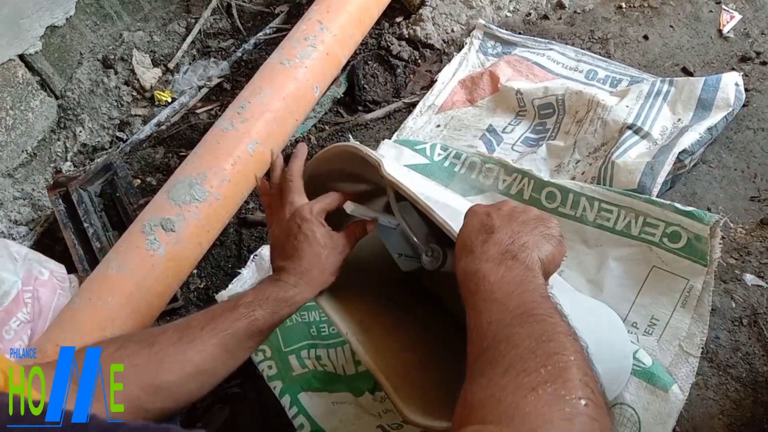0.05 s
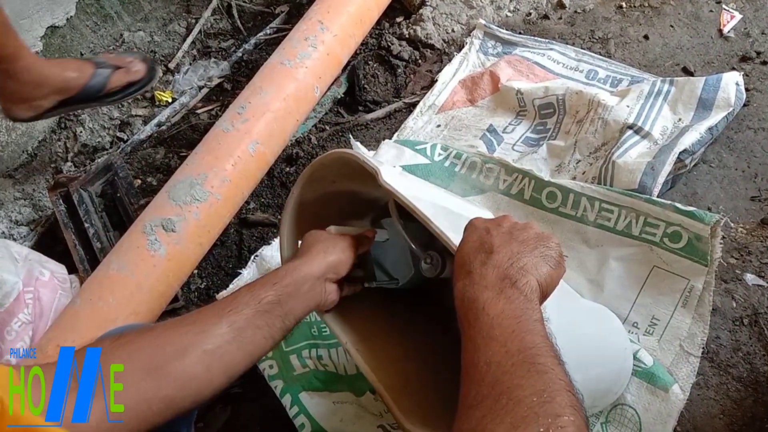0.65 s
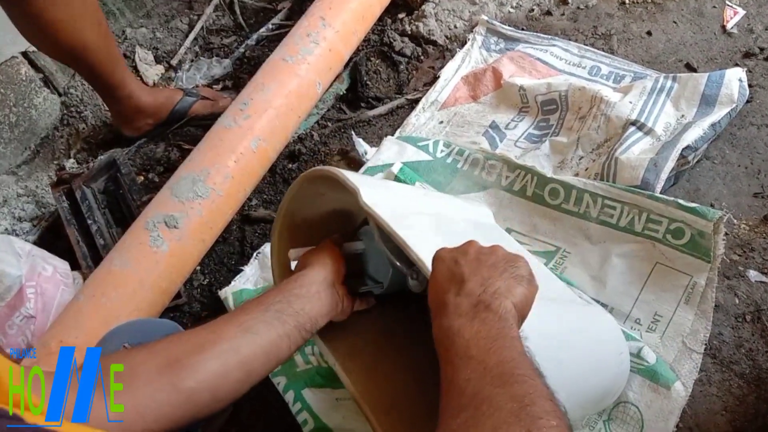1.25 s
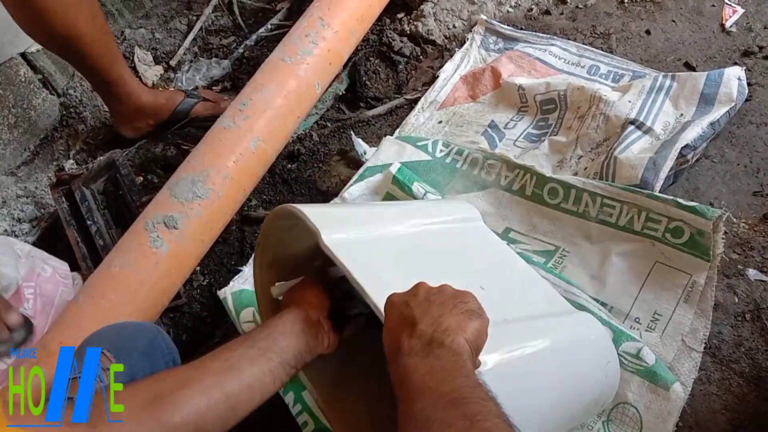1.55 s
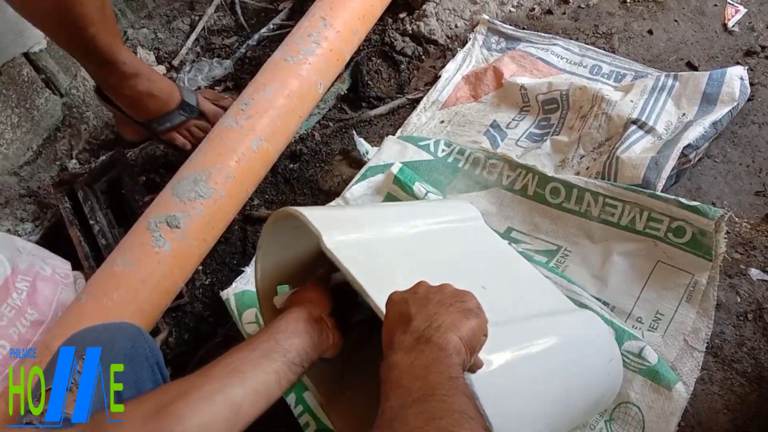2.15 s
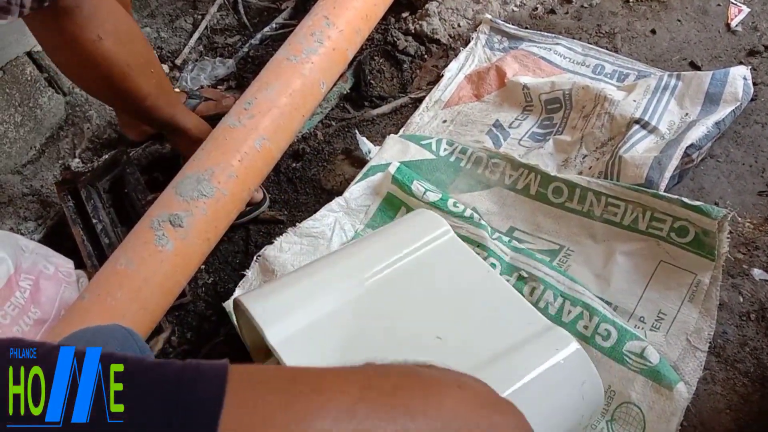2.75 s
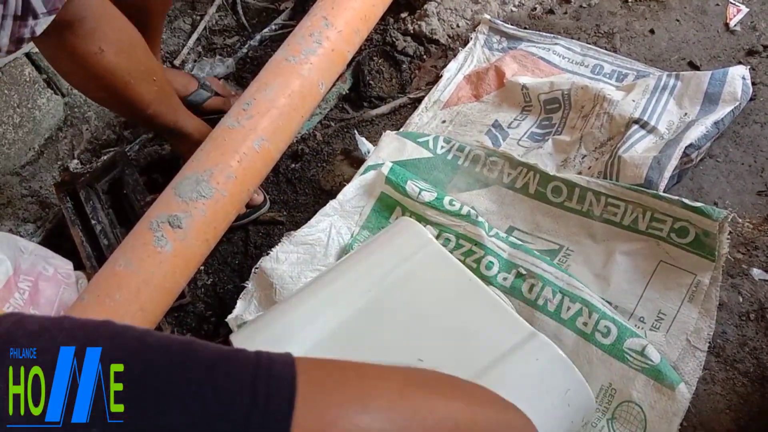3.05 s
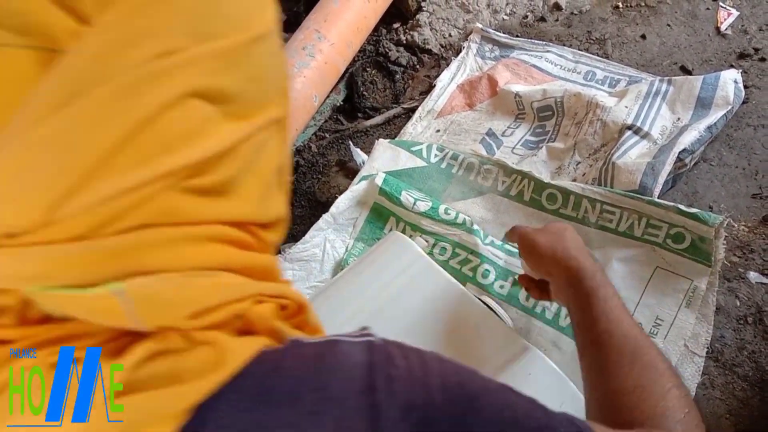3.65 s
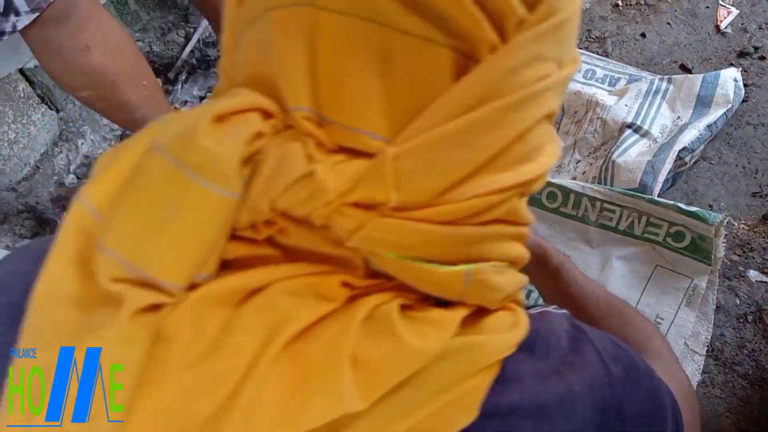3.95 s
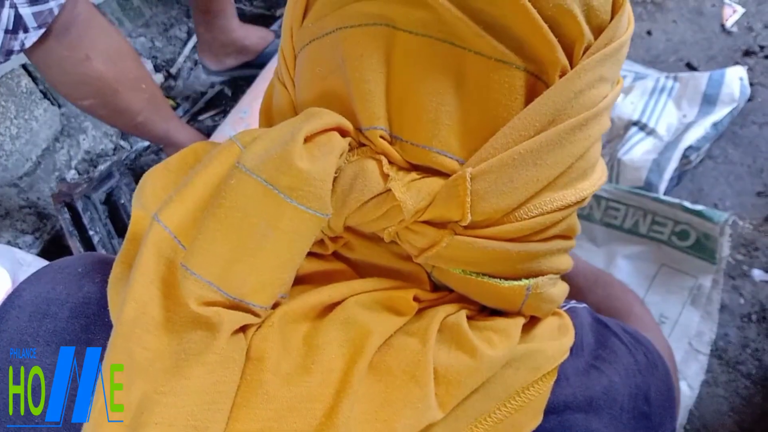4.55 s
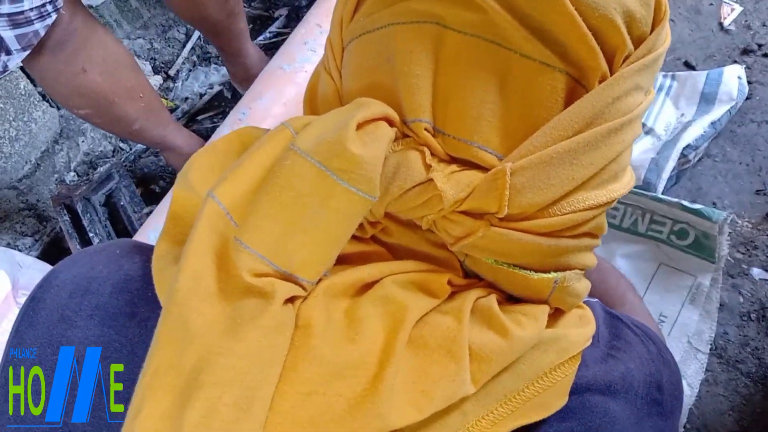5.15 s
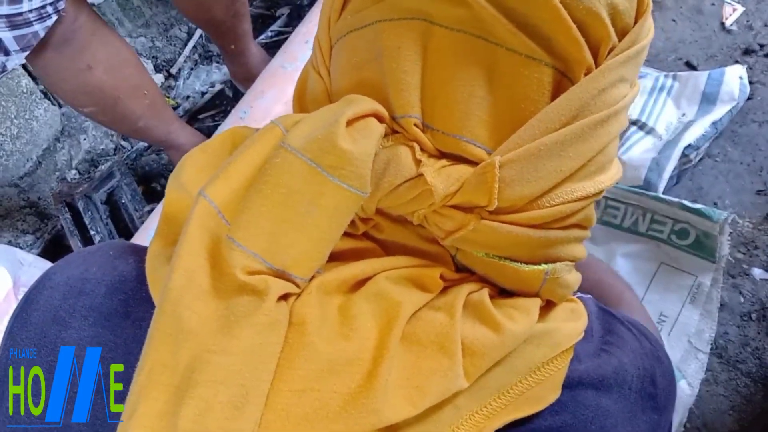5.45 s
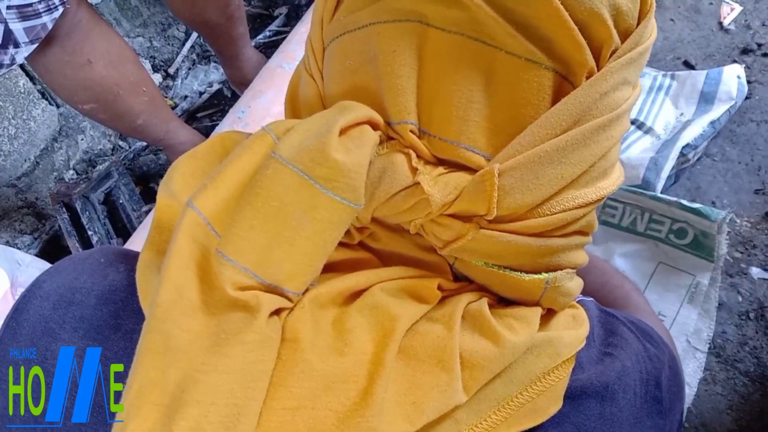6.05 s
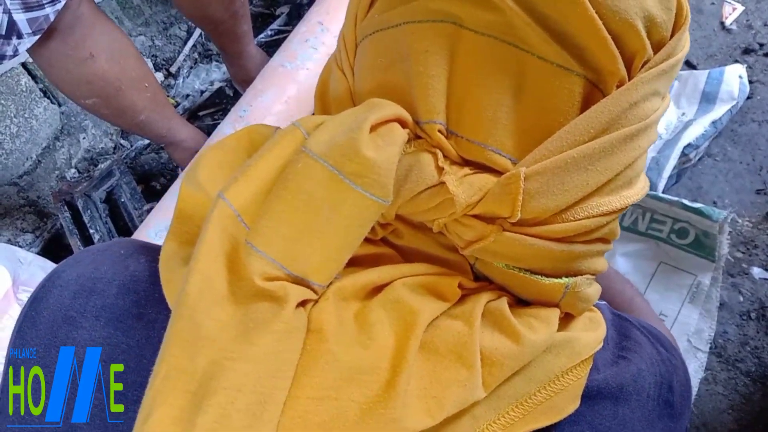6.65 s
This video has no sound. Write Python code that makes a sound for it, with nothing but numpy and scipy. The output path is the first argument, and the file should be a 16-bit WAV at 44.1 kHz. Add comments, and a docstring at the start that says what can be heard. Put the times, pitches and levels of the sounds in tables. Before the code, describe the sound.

A porcelain tank grinds and rustles on woven plastic sacks outdoors, followed by five quick, sharp scraping strokes.

```python
"""Woven plastic sacks rustle and crackle outdoors as a porcelain toilet tank is handled on them: their
strands stick and slip, and creases buckle. The tipped tank grinds over grit, its hollow booms softly,
and fingers knock its plastic valve. Then five quick strokes, each a sharp catch and a scrape, excite
the modes of the porcelain. A low drone swells and fades; a far motor's hum and a thin hiss lie beneath."""
import sys
import numpy as np
from scipy import signal
from scipy.fft import rfft, irfft, next_fast_len
from scipy.io import wavfile
from scipy.ndimage import uniform_filter1d

SR = 44100
rng = np.random.default_rng(int(sys.argv[2]) if len(sys.argv) > 2 else 0)


def unload_wav(signal):
    """Save mono or channel-first audio to the path in sys.argv[1] as 16-bit WAV at rate SR, clipped to [-1, 1]."""
    wavfile.write(
        sys.argv[1],
        SR,
        np.round(np.clip(np.atleast_2d(signal).T, -1, 1) * 32767).astype(np.int16),
    )


N = 299924
T = np.arange(N) / SR


# Rubbing on the sacks as the tank is tipped (time [s], level [dB], bass gain [dB])
TIPPING = [(1.085, -61, -9), (1.135, -42, -17.5), (1.275, -36, -11.5), (1.459, -40, -3.5),
           (1.505, -34, -18.5), (1.62, -37.5, -24)]
# Rubbing as the tank is laid down and pushed along (time [s], level [dB], bass gain [dB])
LAYING = [(2.42, -70.5, -5.5), (2.652, -51.5, -16.5), (2.724, -42, 1), (2.96, -40, -7.5),
          (2.976, -32.5, -7.5), (3.17, -32, -2), (3.382, -42, -13), (3.538, -34.5, -2),
          (3.598, -32.5, -11.5), (3.78, -50.5, -10)]
# Brushes of hands and tank against the sacks (time [s], duration [s], level [dB], bass gain [dB])
BRUSHES = [(-.1, 0.21, -40.5, -13), (0.175, 0.36, -57, -18), (0.43, 0.25, -52, -10), (3.75, 0.29, -46, -12),
           (5.238, .15, -56, -10), (5.43, .06, -62, 12)]
def rubbing():
    """Incoherent sources add in power: the joint level and bass gain of all rubbing, in dB."""
    moves = [(undb(db), bass_db) for db, bass_db in (curves(TIPPING), curves(LAYING))]
    for start, length, db, bass_db in BRUSHES:
        moves.append((undb(db) * burst(start, rise=0.53 * length, t60=0.42, length=length), bass_db))
    power = sum(gain ** 2 for gain, _ in moves)
    bass_power = sum((gain * undb(bass_db)) ** 2 for gain, bass_db in moves)
    return 10 * np.log10(power), 10 * np.log10(bass_power / power)


# Spectrum of the plastic weave (frequency [Hz], level [dB])
WEAVE_SPECTRUM = [(50, -22.5), (110, 0), (160, -24), (235, -4.5), (400, -18), (1100, -3), (2100, -8.5),
                  (3300, -5), (4600, -10.5), (6000, 0), (7900, -19.5), (13500, -17.5), (16000, -26.5)]
def sacks():
    """Stick-slip friction: strands slip in clusters; pressure adds bass, light brushing stays bright."""
    db, bass_db = rubbing()
    slips = colour(grains(rate=2200, spread_db=3) * undb(1.097 * walk(110)), WEAVE_SPECTRUM)
    size = next_fast_len(N)
    spectrum = rfft(slips, size)
    octave = np.log2(np.linspace(1, SR / 2, len(spectrum)) / 1000)  # octaves above 1 kHz
    light_touch_db = np.clip(0.23 * (-34 - db), 0, 12) + 2
    rustle = 0
    for centre in np.arange(-4, 4.5, 0.5):  # each fold sounds in its own band
        band = np.maximum(1 - 2 * abs(octave - centre), 0)
        fold = irfft(spectrum * band, size)[:N]
        bass, treble = np.clip(1.2 - centre, 0, 1), np.clip(2 * (centre - 2), 0, 1)
        tilt_db = bass * (bass_db + 7.5) + treble * light_touch_db
        flicker_db = 4.32 * (1 - treble / 2) * walk(42)
        rustle += fold * undb(db + tilt_db + flicker_db - 2.5)
    return rustle + undb(-10) * scatter(rustle, t60=0.24)


# Single snaps of the weave (time [s], level [dB], centre frequency [Hz])
SNAPS = [(0.501, -31, 5750), (1.689, -14.5, 6150), (2.089, -29.5, 6600), (2.142, -34, 6160),
         (2.767, -23.5, 3450), (2.833, -24.5, 1990), (2.876, -24, 3370), (3.047, -13.5, 9100),
         (3.078, -20, 4080), (3.151, -19.5, 3000), (3.186, -18.5, 4180), (3.241, -17.5, 6900),
         (3.308, -21, 4360), (3.515, -24, 1760), (3.586, -16, 10100), (3.649, -19, 9000),
         (3.732, -25, 2720), (5.851, -16, 12000)]
def snaps():
    """Buckling: a crease gives way with an impulse, settles in milliseconds and excites the sack."""
    crackle = rng.standard_normal(N)
    clicks = 0
    for start, db, hz in SNAPS:
        force = undb(-13) * crackle * burst(start, rise=0.0003, t60=0.01)
        force[int(start * SR)] += 1
        crease_spectrum = [(hz / 12, -38), (hz / 3.5, -18), (hz, 0), (hz * 4, -20)]
        clicks += undb(db + 5.5) * colour(force, crease_spectrum, size=512)
    snap = undb(-1) * colour(clicks, WEAVE_SPECTRUM) + undb(-4) * clicks
    return snap + undb(-9) * scatter(snap, t60=0.07)


# Strokes on the tank (catch time [s], catch level [dB], scrape time [s], scrape level [dB],
# scrape rise [s], slide level [dB], slide duration [s], contact frequency [Hz], edge gain [dB])
STROKES = [(5.608, -36, 5.665, -41.5, 0.0092, -48, .27, 950, -5),
           (5.891, -33, 5.956, -26.5, 0.012, -48.5, .2, 1250, -2),
           (6.148, -38.5, 6.244, -24, 0.0074, -41, 0.2, 1020, 3),
           (6.4145, -28, 6.457, -23, 0.0092, -45, 0.16, 1350, 4.5),
           (6.652, -32, 6.72, -22, 0.015, -39.5, 0.13, 1020, 5)]
# Spectrum of scraped porcelain (frequency [Hz], level [dB])
SCRAPE_SPECTRUM = [(120, -49), (230, -13.5), (400, -11.5), (700, -2), (1300, 3.5), (2100, -7), (3000, -2),
                   (4600, -15), (5550, 2.5), (7700, -18.5), (12000, -15), (16000, -32)]
# Modes of the tank under the strokes (frequency [Hz], energy level [dB], T60 [s])
PORCELAIN_MODES = [(371, -5, 0.12), (585.4, -1.5, 0.2), (860.6, -3, 0.2), (1087, -2.5, 0.09),
                   (1228, 6.5, 0.2), (1467, 4, 0.1), (2946, -4, 0.1), (5290, -4.5, 0.2), (5658, -5.5, 0.2)]
# Spectrum of fine sliding grit (frequency [Hz], level [dB])
FINE_GRIT_SPECTRUM = [(1000, -15.5), (4600, -7), (6000, 7.5), (8000, -9), (16000, -19)]
def strokes():
    """Modal excitation by friction: each stroke meets a new spot and so rings its own mix of modes."""
    mode_spread_db = 4.5
    low, high = split(grains(rate=5500, spread_db=2), hz=5700)
    _, light_friction = split(low + undb(-5) * high, hz=630)
    heavy_friction = low + undb(-13) * high
    forces = contact = porcelain = sliding = 0
    for catch_s, catch_db, scrape_s, scrape_db, rise, slide_db, slide_s, contact_hz, edge_db in STROKES:
        crack = burst(catch_s, rise=0.0017, t60=0.036)
        catch = undb(catch_db) * (crack + burst(catch_s, rise=0.0017, t60=0.36))
        slide = undb(slide_db) * burst(catch_s, rise=0.042, t60=0.24, length=slide_s)
        press = undb(scrape_db) * burst(scrape_s, rise, t60=0.19, length=0.022)
        body, edge = split(catch * light_friction + press * heavy_friction, hz=4700)
        force = body + undb(edge_db) * edge
        drive = force + undb(-6) * slide * light_friction
        modes = [(hz, db + mode_spread_db * rng.uniform(-1.1, 1), t60) for hz, db, t60 in PORCELAIN_MODES]
        forces += force
        contact += narrow(drive, contact_hz)
        porcelain += ring(drive, modes)
        sliding += slide
    scrape = colour(forces, SCRAPE_SPECTRUM) + undb(-10) * contact
    # Fine grit hisses and spatters along each slide.
    fine_grit = grains(rate=4500, spread_db=1.8) * undb(2 * walk(60))
    hiss = colour(sliding * fine_grit, FINE_GRIT_SPECTRUM)
    spurts = unit(rng.standard_normal(N) * undb(5.9 * np.minimum(walk(150), 2)))
    spatter = undb(-7.5) * narrow(sliding * spurts, hz=12200)
    reflections = undb(-12) * scatter(scrape, t60=0.3)
    return undb(-4.5) * scrape + reflections + undb(-6.5) * porcelain + hiss + spatter


# Drag of the tank over grit (time [s], level [dB], bass gain [dB])
DRAG = [(1.6, -34, -14), (1.69, -27.5, -1.5), (1.77, -18.5, 6), (1.85, -25, 9.5), (1.905, -29, 14.5),
        (2.0, -49.5, 7), (2.25, -61, 0)]
# Jolts as the tank slips, then two sharp scuffs near 2.7 s and 3.9 s (time [s], level [dB], T60 [s], bass gain
# [dB])
JOLTS = [(1.639, -19.5, 0.12, -27), (1.706, -16, 0.047, 4.5), (1.743, -14.5, 0.072, 11.5),
         (1.864, -13.5, 0.049, -7), (2.696, -29.5, 0.12, -20), (3.88, -26, 0.15, -47)]
# Spectrum of crushed grit (frequency [Hz], level [dB])
GRIT_SPECTRUM = [(100, -29), (235, -12.5), (500, -12.5), (1300, -6), (1900, -11.5), (3000, -4.5),
                 (4600, -6.5), (6100, 7.5), (7700, -14.5), (10000, -19.5), (13000, -9), (16000, -23.5)]
# Modes of the tank's wall (frequency [Hz], energy level [dB], T60 [s])
WALL_MODES = [(239, -3, 0.17), (1060, -2, 0.36), (2774, -6, 0.22), (5052, -3.5, 0.26)]
def grind():
    """Granular friction: the tank's weight crushes grit in jolts, forcing its wall into vibration."""
    db, bass_db = curves(DRAG)
    low, high = split(grains(rate=12000, spread_db=1) * undb(0.71 * walk(160)), hz=2200)
    force = undb(db) * (undb(bass_db) * low + high)
    for start, jolt_db, t60, jolt_bass_db in JOLTS:
        force += undb(jolt_db) * burst(start, rise=0.0008, t60=t60) * (undb(jolt_bass_db) * low + high)
    crunch = colour(force, GRIT_SPECTRUM)
    reflections = undb(-11.5) * scatter(crunch, t60=0.22)
    return undb(-3) * crunch + reflections + undb(-16.5) * ring(force, WALL_MODES)


# Brief squeaks and pings (time [s], level [dB], frequency [Hz], rise [s], T60 [s])
PINGS = [(1.863, -23, 2063, 0.0049, 0.13), (1.83, -23.5, 1065, 0.074, 0.21)]
def pings():
    """Contact-excited vibration: hard parts rub and touch with short, wavering notes."""
    return sum(undb(db) * burst(start, rise, t60) * wavering_tone(hz, waver_hz=37.2, rate=600)
               for start, db, hz, rise, t60 in PINGS)


# Soft booms of the tank's hollow (time [s], level [dB])
BOOMS = [(1.702, -29.5), (2.445, -50), (3.0, -40.5), (3.2, -41), (3.5, -47.5), (3.95, -55), (5.72, -49.5),
         (5.9, -42), (6.26, -46)]
def hollow():
    """Cavity resonance: handling stirs the air in the tank into a soft boom."""
    air = wavering_tone(hz=232, waver_hz=17, rate=110) * undb(2 * walk(70))
    return air * sum(undb(db) * burst(start, rise=0.011, t60=0.4, length=0.052) for start, db in BOOMS)


# Finger knocks on the valve (time [s], level [dB], centre frequency [Hz])
KNOCKS = [(.598, -46, 2500), (.712, -49.5, 2000), (.817, -53, 3000), (1.125, -39, 3575), (5.565, -52, 2660)]
# Modes of the plastic valve inside the tank (frequency [Hz], energy level [dB], T60 [s])
VALVE_MODES = [(999, -5, 0.05), (1590, 0, 0.04), (2223, -4, 0.07), (3575, -3, 0.24)]
def valve():
    """Impact excitation: fingers knock the valve at differing spots; it rattles while a hand works it."""
    hand_at_work = np.interp(T, [1.3, 1.6, 5.15, 5.35, 5.5], [1, 0, 0, 1, 0])
    rattle = grains(rate=90, spread_db=1.5) * hand_at_work * undb(-64 + 4.5 * walk(16))
    crack = rng.standard_normal(N)
    knocks = contact = 0
    for start, db, hz in KNOCKS:
        force = undb(db) * crack * burst(start, rise=0.002, t60=0.045)
        knocks += force
        contact += narrow(force, hz)
    impacts = rattle + knocks
    return contact + undb(-8) * impacts + ring(impacts + contact / 2, VALVE_MODES)


# Short scuffs (time [s], level [dB], centre frequency [Hz])
SCUFFS = [(.32, -48, 5900), (1.385, -43, 750), (4.775, -51, 5520), (6.305, -36, 12600)]
def scuffs():
    """Sliding friction: hands, cloth and tank slip a short way, each time in a narrow band."""
    slips = grains(rate=1100, spread_db=1.5)
    return sum(undb(db) * narrow(slips * burst(start, rise=0.015, t60=0.2), hz)
               for start, db, hz in SCUFFS)


# Dull bumps on the ground (time [s], level [dB], centre frequency [Hz])
BUMPS = [(1.2, -58, 105), (2.04, -58, 105), (2.705, -52, 430), (2.998, -45.5, 440)]
def bumps():
    """Friction under load: the tank's weight shifts on the ground with a dull rumble."""
    slips = grains(rate=2500, spread_db=2.5)
    thuds = 0
    for start, db, hz in BUMPS:
        rumble = colour(slips, [(hz / 3, -25), (hz, 0), (hz * 10, -65)])
        thuds += undb(db) * burst(start, rise=0.028, t60=0.22, length=0.19) * rumble
    return thuds


# Swell of the low drone (time [s], level [dB])
DRONE_SWELL = [(2.79, -70), (2.89, -49), (3.5, -43), (3.72, -50.5), (4.35, -69)]
def drone():
    """Amplitude modulation: a wavering low note and a soft rumble swell and fade together."""
    db, = curves(DRONE_SWELL)
    note = wavering_tone(hz=96.6, waver_hz=1.2, rate=13) * undb(1.3 * walk(5.9))
    rumble = narrow(rng.standard_normal(N), hz=110)
    return undb(db) * (note + undb(-4) * rumble)


# Spectrum of the steady outdoor hiss (frequency [Hz], level [dB])
AMBIENT_SPECTRUM = [(30, -32), (115, -6), (440, -22), (4300, -29.5), (5800, -19.5), (6700, 2.5),
                    (7450, -10.5), (9000, -8), (11200, -27), (16000, -47)]
def background():
    """Superposition of tone and noise: a far motor hums under a steady thin hiss."""
    hum = wavering_tone(hz=118, waver_hz=1.8, rate=24) * undb(1.9 * walk(1.2))
    hiss = colour(rng.standard_normal(N), AMBIENT_SPECTRUM)
    return undb(-54.5) * hiss + undb(-66) * hum


def close_walls(x):
    """Comb filtering: echoes off porcelain and ground return within milliseconds and hollow the sound."""
    echoes = [(0.0024, 0.25), (0.0037, -0.22), (0.0061, 0.2)]  # (delay [s], gain [ratio])
    reflected = sum(gain * np.interp(T - delay, T, x) for delay, gain in echoes)
    return (x + reflected) / np.sqrt(1 + sum(gain ** 2 for _, gain in echoes))


def scatter(x, t60):
    """Diffuse reflection: dense echoes act as an impulse response of decaying noise."""
    tail = rng.standard_normal(N) * burst(0, rise=0.00098, t60=t60)
    return through(x, tail[:SR // 2])


def ring(x, modes):
    """Modal superposition: the force x drives a sum of damped sinusoids."""
    t = T[:SR // 2]
    response = sum(undb(db) / np.sqrt(t60) * np.exp(-np.log(1000) * t / t60) * np.cos(2 * np.pi * hz * t)
                   for hz, db, t60 in modes)
    return through(x, response)


def grains(rate, spread_db):
    """Shot noise: tiny slips of uneven size at random moments, about `rate` a second; rms 1."""
    size = undb(spread_db * np.minimum(rng.exponential(size=N), 4))
    return unit((rng.random(N) < rate / SR) * size * rng.choice([-1, 1], N))


def wavering_tone(hz, waver_hz, rate):
    """Frequency modulation: a sinusoid wanders about hz by waver_hz rms."""
    return np.sin(2 * np.pi * np.cumsum(hz + waver_hz * walk(rate)) / SR)


def walk(rate):
    """Low-pass noise: a smooth wander through `rate` random values a second; rms 1."""
    span = max(int(SR / rate), 2)
    steps = np.repeat(rng.standard_normal(N // span + 1), span)
    return unit(uniform_filter1d(steps, span)[:N])


def burst(start, rise, t60, length=0):
    """Exponential decay after a linear rise to 1, held until `length` is over; times in seconds."""
    hold = max(rise, length)
    sounding = (T > start) & (T < start + hold + 2 * t60)
    age, envelope = T[sounding] - start, np.zeros(N)
    decay = np.exp(-np.log(1000) * np.maximum(age - hold, 0) / t60)
    envelope[sounding] = np.minimum(age / rise, 1) * decay
    return envelope


def curves(rows):
    """Linear interpolation of columns over time; the first is a level, silent outside its span."""
    times, db, *rest = np.transpose(rows)
    return [np.interp(T, times, db, left=-120, right=-120)] + [np.interp(T, times, c) for c in rest]


def colour(x, points, size=4096):
    """Minimum-phase filtering by a spectrum of points (frequency [Hz], level [dB])."""
    hz, db = np.transpose(points)
    bins_hz = np.maximum(np.arange(size // 2 + 1) * SR / size, 1)
    magnitude = undb(np.interp(np.log(bins_hz), np.log(hz), db))
    cepstrum = irfft(np.log(magnitude))
    cepstrum[1:size // 2] *= 2  # folding the cepstrum makes the filter causal
    cepstrum[size // 2 + 1:] = 0
    return through(x, irfft(np.exp(rfft(cepstrum))))


def narrow(x, hz):
    """Band-pass filtering around one frequency."""
    return colour(x, [(hz / 2, -38), (hz, 0), (hz * 2, -42)])


def split(x, hz):
    """Crossover into low and high parts; opposite polarity avoids a notch in their sum."""
    return [sign * signal.sosfilt(signal.butter(2, min(hz, SR / 3), kind, fs=SR, output="sos"), x)
            for kind, sign in (("low", 1), ("high", -1))]


def through(x, response):
    """Convolution with an impulse response of unit energy."""
    return signal.oaconvolve(x, response / np.linalg.norm(response))[:N]


def unit(x):
    """Normalisation to rms 1."""
    return x / np.sqrt(np.mean(x ** 2))


def undb(db):
    """Amplitude ratio of a level in decibels."""
    return 10 ** (np.asarray(db) / 20)


def scene():
    """Linear superposition: all sources add at one nearby point."""
    handling = close_walls(sacks() + grind()) + valve() + snaps() + scuffs() + strokes() + pings()
    return (handling + hollow() + bumps() + drone() + background())[None]


def record(dry):
    """Soft saturation rounds the loudest peaks, and a steep low-pass filter cuts the highest treble."""
    ceiling, cutoff_hz = 0.8, 15800
    rounded = dry / (1 + (dry / ceiling) ** 6) ** (1 / 6)
    return signal.sosfilt(signal.ellip(10, 0.2, 80, cutoff_hz, fs=SR, output="sos"), rounded)


dry = scene()
out = record(dry)
unload_wav(out)
```